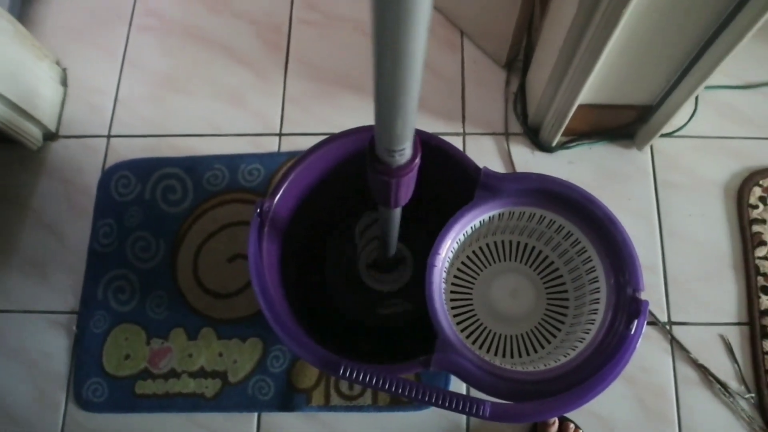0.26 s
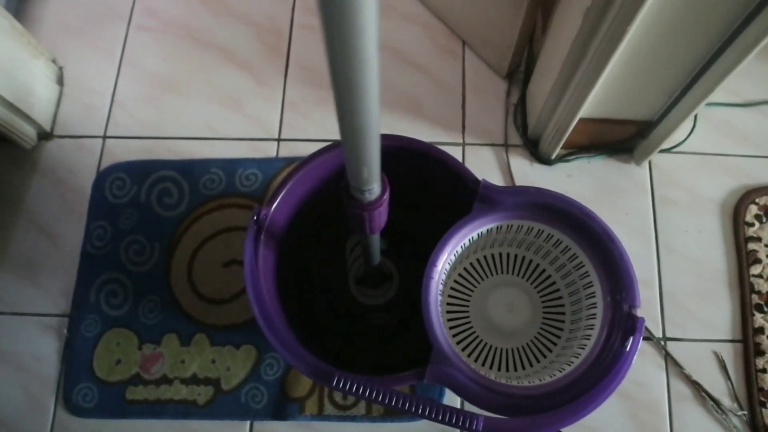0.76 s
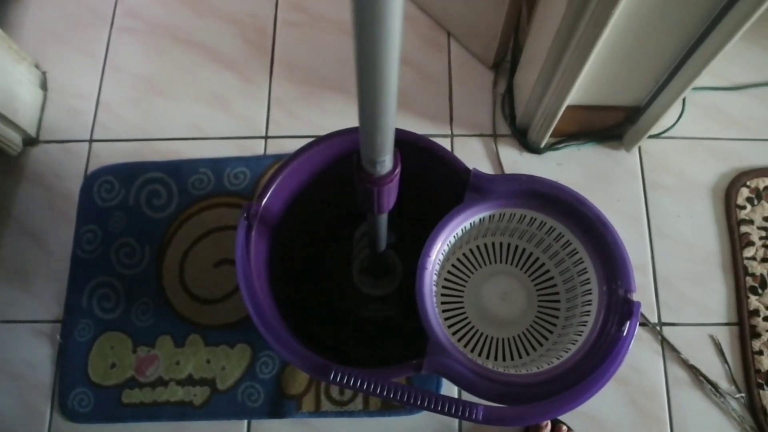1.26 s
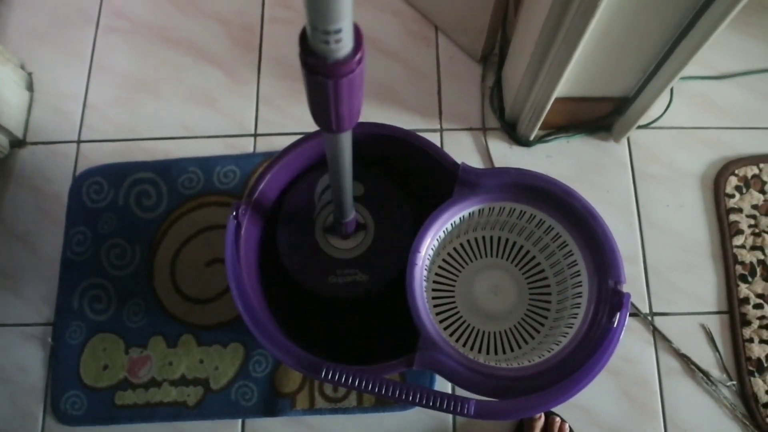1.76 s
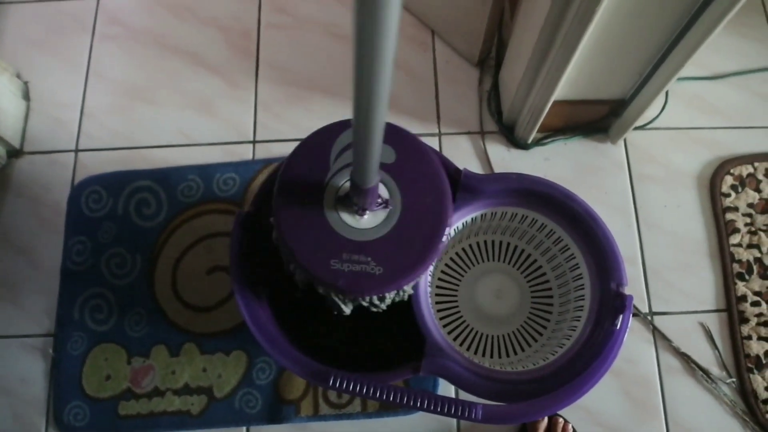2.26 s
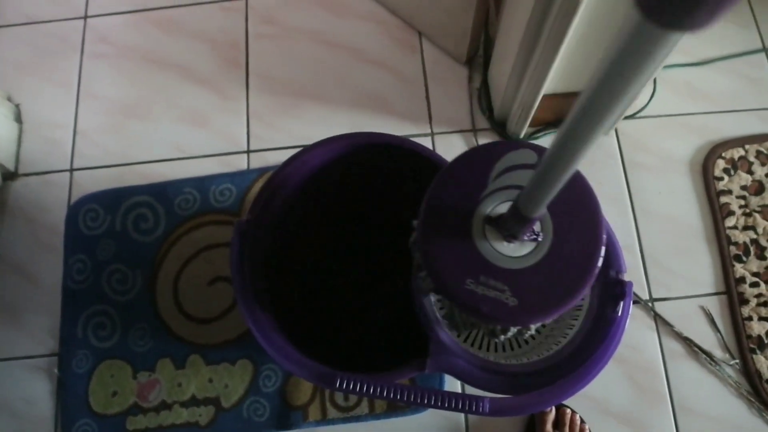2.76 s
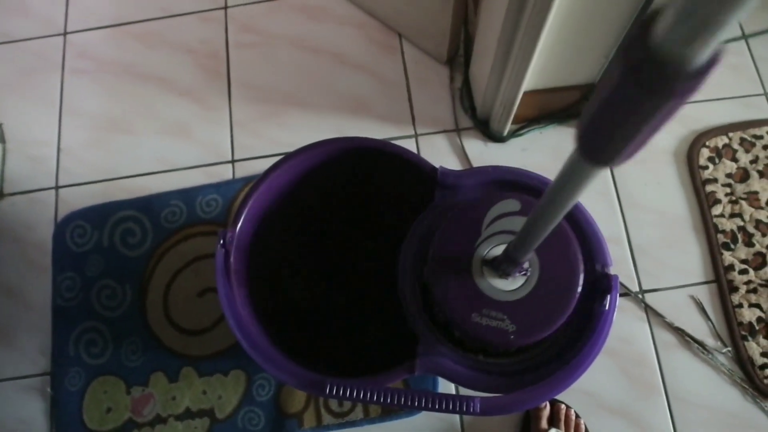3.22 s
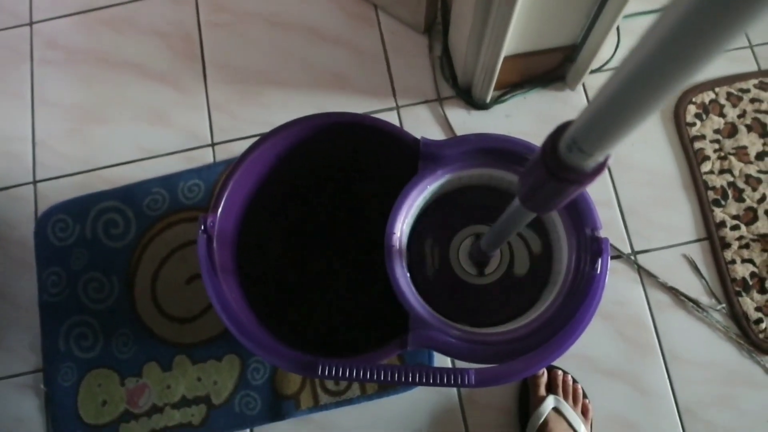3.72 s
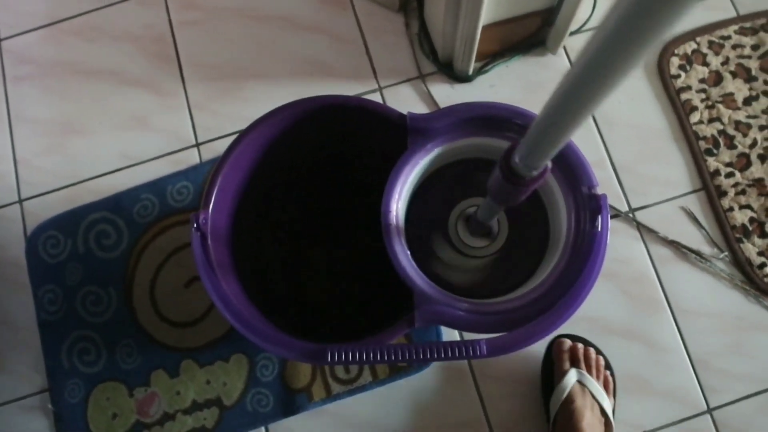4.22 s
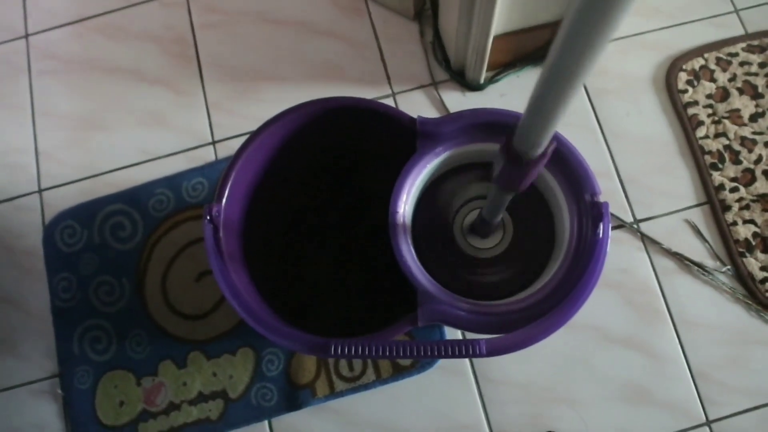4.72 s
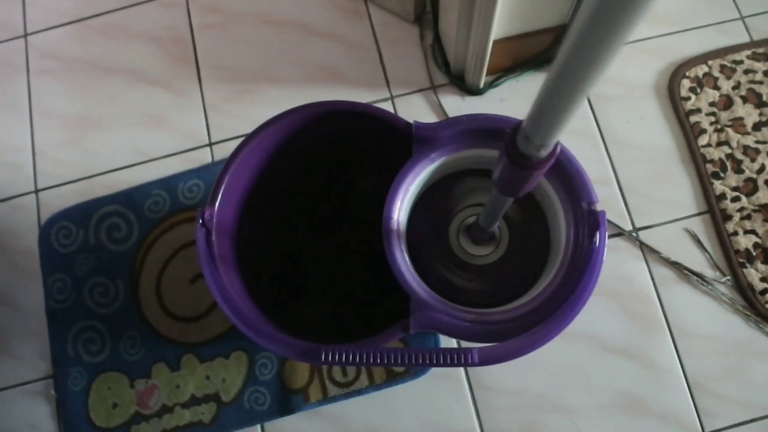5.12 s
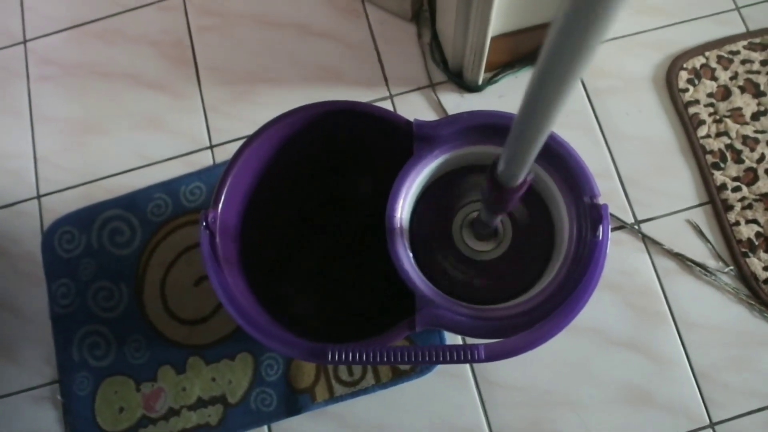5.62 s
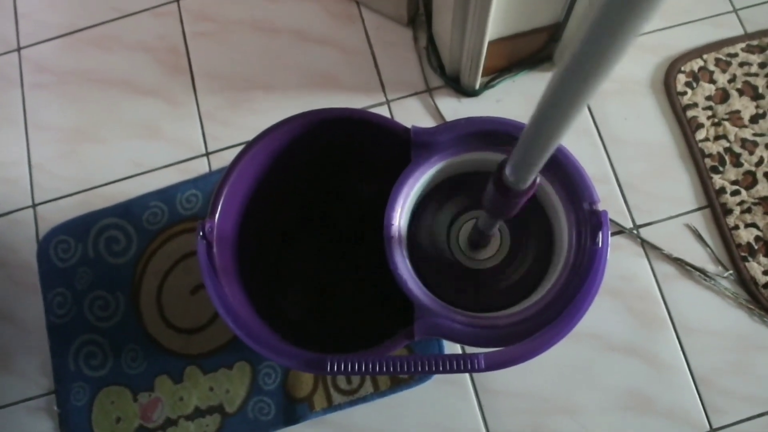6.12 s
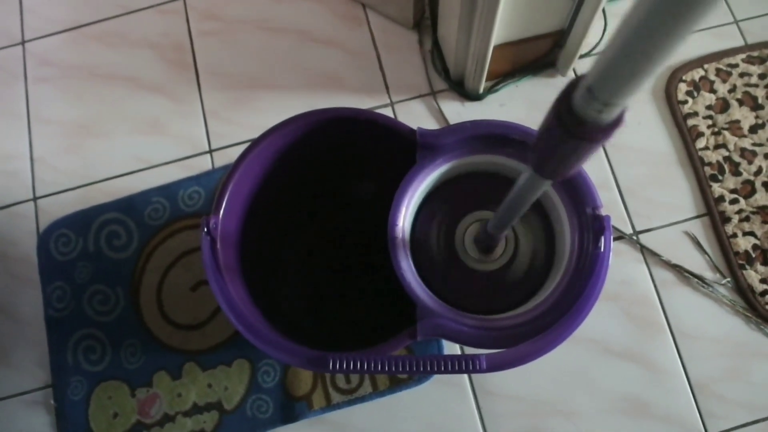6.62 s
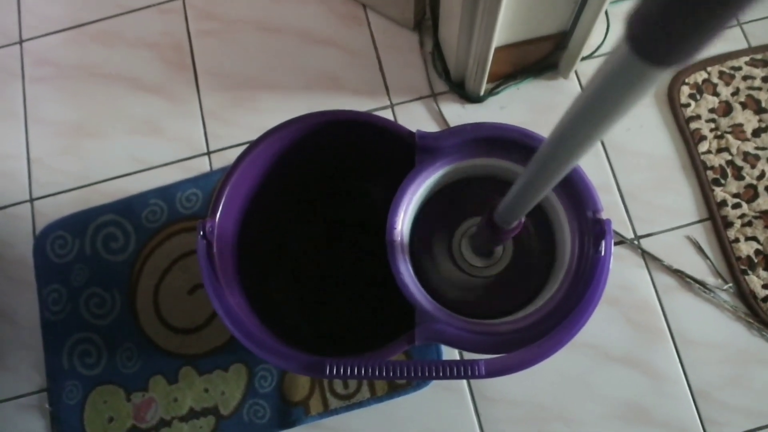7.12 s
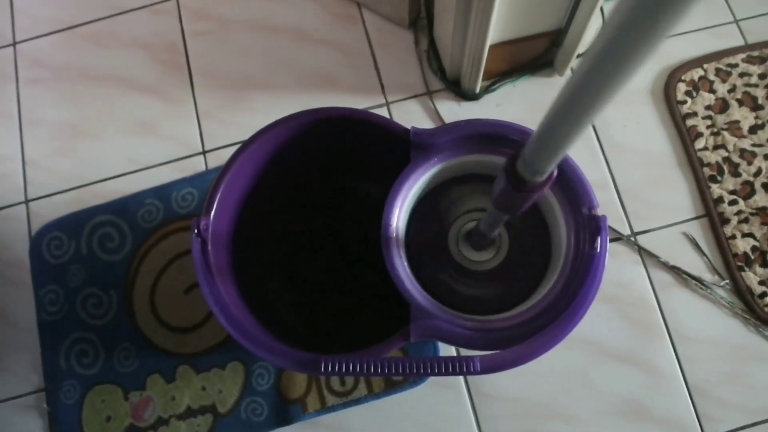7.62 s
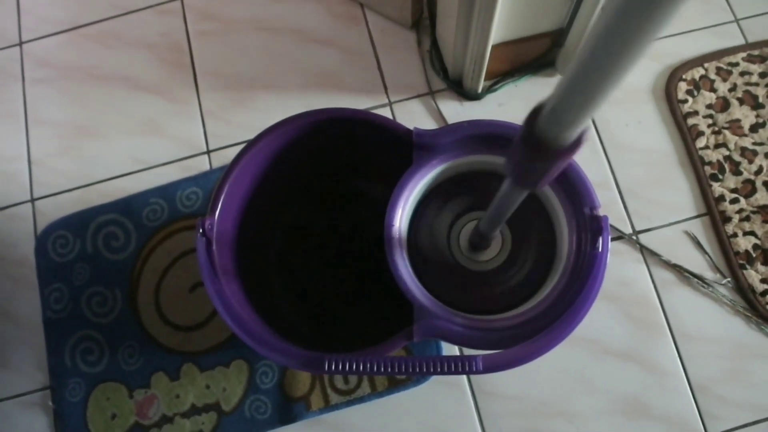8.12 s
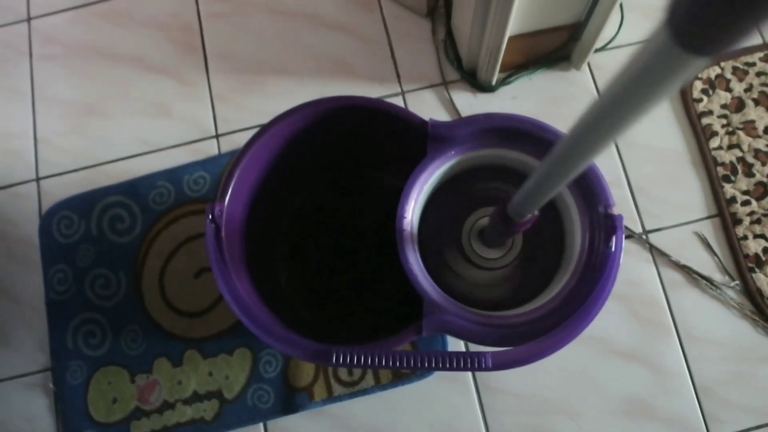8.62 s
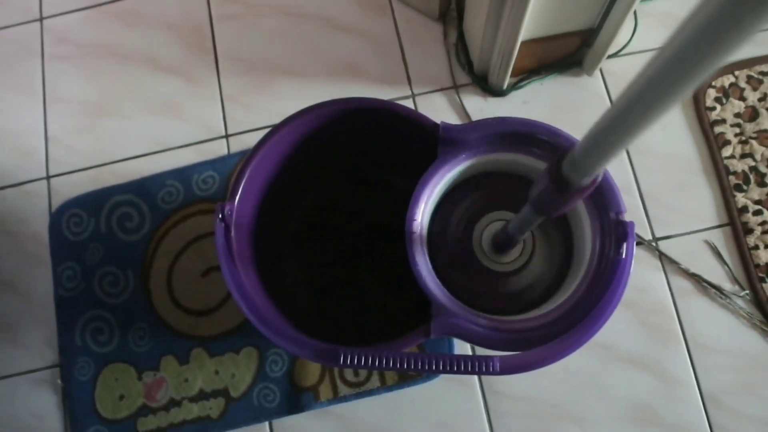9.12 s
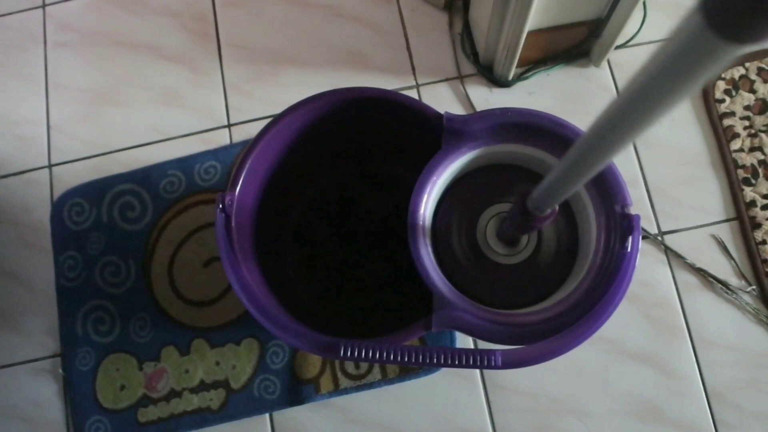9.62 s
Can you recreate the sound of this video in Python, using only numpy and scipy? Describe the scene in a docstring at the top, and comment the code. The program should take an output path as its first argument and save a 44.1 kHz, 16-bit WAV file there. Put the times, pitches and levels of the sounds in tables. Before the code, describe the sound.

Close to a plastic spin-mop bucket in a tiled room, with faint air noise, drone and hum. From 0 to 0.5 s, the end of a ratcheting stroke brings sharp handle clacks and hollow thumps around 280 Hz. Until 2.1 s, water sloshes and gurgles softly with sparse knocks and plinking drops. Around 2.2-2.8 s the lifted head sheds a brighter patter of drips, then it settles quietly into the basket, with small ticks and low rumbling until 4.4 s. From 4.5 s pumping starts: coarse, toothy grinding, dense plastic-metal clacks and bucket drumming. Strokes bottom near 4.8, 5.7, 6.6, 7.4, 8.1 and 8.9 s, with another running to the end; between them grinding slackens. Spray hisses finely, and the pole briefly sings near 1.4 kHz late in strokes. Thumps are strongest near 6.5, 7.9 and 9.75 s. Short, low room reverberation; wide stereo, slightly limited treble.

```python
"""A spin mop is pumped in a plastic bucket of water, lifted dripping into the basket and pumped there.
The helical rod grinds, clacks and sings in its handle and pole; the wobbling head thumps and drums on the bucket.
Filtered noise and swarms of short bubbles make spray and trickle; single drops splat and plink.
Place: a tiled room with air noise, drone and mains hum. Distance: close, the room's answer well below.
Microphone: a small camera's two ports above, spread by a widening matrix, with soft overload and a treble limit."""
import sys
import numpy as np
from scipy import signal
from scipy.fft import rfft, irfft, next_fast_len
from scipy.io import wavfile
from scipy.ndimage import uniform_filter1d, map_coordinates

SR = 44100
rng = np.random.default_rng(int(sys.argv[2]) if len(sys.argv) > 2 else 0)


def inscribe(sig):
    """Save sig as 16-bit PCM at rate SR to the path in sys.argv[1].

    A 1-D sig is mono; a 2-D sig holds one channel per row.
    Samples are clipped to [-1, 1] before scaling.
    """
    pcm = np.round(np.clip(np.atleast_2d(sig).T, -1, 1) * 32767)
    wavfile.write(sys.argv[1], SR, pcm.astype(np.int16))


N = 434826

# Head against bucket: (time [s], level [dB], pitch [Hz])
THUMPS = [(0.149, -14.5, 283), (0.236, -18.5, 273), (0.343, -14.5, 295), (0.418, -20.5, 350),
          (0.458, -24.5, 334), (0.784, -30.5, 370), (0.825, -27, 333), (1.205, -20, 248),
          (1.502, -24.5, 336), (1.687, -29.5, 334), (1.931, -28.5, 287), (2.02, -29.5, 295),
          (2.072, -22, 300), (3.404, -30, 356), (4.373, -25.5, 284), (4.434, -24.5, 282), (4.481, -25, 286),
          (4.597, -25, 351), (4.672, -16, 284), (4.792, -15, 280), (4.898, -20, 277), (5.023, -20.5, 252),
          (5.468, -19.5, 246), (5.527, -15, 305), (5.578, -13, 261), (5.639, -14, 255), (5.684, -13, 271),
          (5.799, -24, 270), (5.89, -19.5, 268), (5.943, -25, 264), (6.366, -20.5, 318),
          (6.488, -10.5, 272.4), (6.518, -25, 272), (6.596, -13.5, 274.5), (6.69, -17.5, 272),
          (6.768, -11, 272), (7.175, -20, 300), (7.218, -21.5, 318), (7.278, -25.5, 358),
          (7.416, -19.5, 275), (7.506, -18.5, 271), (7.589, -12, 264), (7.937, -10, 265), (8.137, -15, 273),
          (8.234, -17, 273), (8.307, -12.5, 276), (8.333, -20, 271), (8.67, -21, 382), (8.731, -18.5, 264),
          (8.832, -16.5, 270), (8.93, -15, 266), (9.004, -19.5, 285), (9.045, -19, 285),
          (9.062, -11.5, 261), (9.443, -26, 280), (9.571, -24, 310), (9.612, -26, 283), (9.656, -13, 244),
          (9.7, -15.5, 302), (9.754, -7, 257)]
# Rod and rim contacts: (time [s], level [dB], strongest pitch [Hz], crack relative to the level [dB])
CLACKS = [(0.018, -16.5, 2590, -5.5), (0.051, -26.5, 1450, 1), (0.072, -20, 1970, -8),
          (0.085, -17, 1410, -6), (0.101, -18, 3350, -7.5), (0.13, -8, 1480, -12.5),
          (0.336, -15, 1106, -17), (0.411, -24.5, 1220, -11), (0.43, -12.5, 990, -27),
          (0.794, -22.5, 3280, -3), (0.802, -31, 3400, -10), (0.842, -23.5, 1300, -36),
          (1.213, -21.5, 1470, -7.5), (1.392, -22, 2300, -28), (1.518, -21, 1366, -16),
          (2.174, -28.5, 2070, -9.5), (2.286, -28, 2740, -6), (2.693, -27.5, 1650, -10),
          (3.402, -30, 1068, -9.5), (3.49, -26, 886, -10.5), (3.57, -23.5, 1890, -26),
          (3.799, -39.5, 1710, 1.5), (4.531, -22.5, 1590, -14), (4.549, -19, 1650, -16),
          (4.606, -18, 3450, -10.5), (4.629, -18.5, 2570, -14), (4.644, -17, 2630, -13),
          (4.751, -28, 1670, -3), (4.766, -23, 3440, -8), (4.782, -14, 1155, -3),
          (4.823, -15.5, 1040, -6.5), (4.862, -20, 1930, -3.5), (4.88, -22, 1050, -8),
          (4.892, -17.5, 1043, -6), (4.939, -16.5, 1054, -22), (5.012, -25, 1900, -2.5),
          (5.028, -19, 1620, -17.5), (5.437, -22, 1560, -25), (5.462, -20, 1770, -24),
          (5.478, -24, 1530, -27), (5.493, -21, 1640, -20), (5.552, -16.5, 2350, -11),
          (5.576, -16, 2710, -12), (5.588, -15.5, 2560, -13), (5.61, -18, 2520, -13),
          (5.623, -20.5, 2560, -7), (5.64, -16, 2220, -21), (5.667, -16.5, 2550, -13),
          (5.691, -18.5, 2070, -9), (5.723, -10.5, 1093, -7), (5.75, -13.5, 1260, -6),
          (5.764, -14, 2720, -8), (5.778, -21.5, 1180, 0.5), (5.786, -23, 1190, -8),
          (5.808, -20.5, 1150, 0.5), (5.854, -24, 1920, -3.5), (5.866, -17, 1410, -9.5),
          (5.941, -21.5, 1650, -8), (6.376, -18, 2530, -12.5), (6.453, -19.5, 2580, -20),
          (6.527, -17.5, 2180, -15), (6.599, -14.5, 1160, -3), (6.645, -17, 3300, -3.5),
          (6.792, -16, 1830, -11), (6.936, -27, 1030, -15), (7.027, -25, 1304, -10),
          (7.125, -21.5, 1590, -29), (7.194, -22, 2600, -6), (7.227, -20, 2610, -5.5),
          (7.275, -15.5, 2630, -10), (7.353, -13.5, 1390, -12.5), (7.389, -10.5, 3430, -8),
          (7.426, -20.5, 1120, -7), (7.467, -24.5, 2700, 0.5), (7.592, -16, 1080, -9),
          (7.843, -23, 1490, -32), (7.879, -30, 1580, -31), (7.935, -20, 1080, -23),
          (7.956, -19.5, 2000, -13), (8.081, -19, 2050, -14), (8.145, -12.5, 1040, -2),
          (8.19, -17, 1120, -15), (8.207, -24, 1000, -4), (8.228, -21, 2610, 1.5),
          (8.244, -21.5, 1970, -11), (8.335, -11, 1613, -12.5), (8.462, -22.5, 1030, -27),
          (8.597, -19, 1324, -35), (8.678, -24, 2500, -6), (8.694, -18.5, 2640, -12),
          (8.822, -19.5, 1380, -3), (8.839, -14.5, 1150, -6), (8.892, -15.5, 1040, -1.5),
          (8.919, -17.5, 1140, -7), (8.937, -13, 3230, -16), (8.979, -23.5, 1230, -12),
          (9.045, -17.5, 1670, -7), (9.14, -23.5, 1620, -19), (9.265, -23.5, 1350, -34),
          (9.346, -22, 1520, -34), (9.421, -23, 1960, -14), (9.442, -16.5, 2570, -14),
          (9.471, -21.5, 2600, -4.5), (9.502, -22, 1990, -10), (9.533, -18, 2400, -38),
          (9.589, -16, 1960, -15), (9.741, -21.5, 1500, -26), (9.819, -21, 1940, -17),
          (9.845, -16.5, 1834, -20), (0.042, -15, 2550, -18), (4.802, -24, 1040, -2),
          (4.84, -15.5, 1030, -3), (6.387, -19, 2540, -13.5), (6.583, -27, 1080, -2),
          (6.613, -21, 1060, -5.5), (6.626, -19.5, 2720, -3.5), (6.664, -20, 3340, -21),
          (6.682, -19.5, 2660, -11), (7.307, -23.5, 1550, -8), (7.449, -18.5, 3330, -4),
          (8.094, -17.5, 1470, -11), (8.861, -28, 2600, -23), (8.904, -16.5, 1110, -25),
          (9.452, -21, 2110, -26), (9.62, -17, 2520, -27), (9.71, -24, 1980, -32)]
# Brightest contacts, short treble flashes: (time [s], relative level [dB])
SNAPS = [(0.7991, -28), (6.6467, -32), (7.3903, -21), (8.1459, -23), (8.2275, -24), (8.333, -28),
         (8.8393, -32), (8.8922, -26)]
# Single drops: (time [s], relative level [dB], bubble pitch [Hz])
DRIPS = [(0.4656, -23, 3440), (0.605, -27, 2380), (0.9413, -29, 2050), (0.9845, -27.5, 1950),
         (1.1752, -25.5, 2450), (1.4637, -21, 2320), (1.6888, -25.5, 2490), (1.7374, -24, 2100),
         (1.858, -28, 2350), (2.3403, -23.5, 1800), (2.419, -29, 2500), (2.505, -28, 873),
         (2.546, -23, 904), (2.601, -26, 1550), (2.628, -21.5, 2850), (2.682, -24.5, 515),
         (2.7236, -19.5, 3750), (2.839, -26, 3660), (2.869, -26, 1530), (2.992, -32.5, 1730),
         (3.1714, -28, 2000), (3.3374, -25.5, 2510), (3.4233, -25.5, 1260), (3.449, -30.5, 860),
         (3.835, -25.5, 1450), (3.913, -24, 2260), (3.9739, -24, 2530), (6.2438, -29, 1660),
         (6.274, -32, 1430), (6.313, -28.5, 1600)]
# Resonances of handle, metal pole and bucket: (frequency [Hz], width [Hz], relative level [dB])
HANDLE_MODES = [(907, 257, 4), (1055, 210, 6.5), (1354, 270, 6), (1940, 370, 6.5), (2587, 320, 3.5),
                (3313, 190, -0.5), (4030, 510, -10), (5250, 300, -5)]
POLE_MODES = [(730, 89, -5), (1435, 42, -2.5), (1979, 79, 2), (2606, 130, 2), (3396, 156, -2.5),
              (5040, 40, -13.5)]
BUCKET_MODES = [(121.7, 30, -8), (162, 32, -7), (215, 17.7, -1.5), (272.5, 56.3, 0.5), (354, 53.6, -1),
                (512, 254, -8.5)]
# Noise colours of rubbing, cracks, spray and room air: (frequency [Hz], relative density [dB per Hz])
SCRAPE_SPECTRUM = [(240, -11), (400, 2), (1360, -1.5), (1940, -2.5), (3060, -8), (3380, -9.5),
                   (4370, -17.5), (5180, -24), (12000, -35), (15600, -72), (22000, -120)]
CRACK_SPECTRUM = [(2500, 2.5), (4500, 2.5), (6000, -2), (9000, -12), (12000, -22.5), (15800, -53)]
SPRAY_SPECTRUM = [(290, -40), (500, -28), (866, -8.5), (1060, -7), (2420, -12), (5660, -18.5),
                  (12000, -27.5), (14700, -54), (15800, -64)]
AIR_SPECTRUM = [(13, -25), (22, -4), (59, 4), (166, -5), (224, 3), (293, 0.5), (662, -18), (1690, -18.5),
                (2110, -55), (3630, -16), (8000, -84), (10400, -60), (17600, -120)]
# Low tones of the room: (time [s], drone level [dB], mains hum level [dB])
DRONE_AND_HUM = [(0.0, -49, -59), (0.3, -68, -54.5), (1.73, -57, -46.5), (2.83, -49, -55.5),
                 (3.35, -58, -50), (5.74, -74, -54), (5.88, -62, -66), (7.17, -41, -48.5), (9.11, -57, -56),
                 (9.86, -41, -43)]
# Decay of the tiled room: (frequency [Hz], t60 [s])
ROOM_T60 = [(200, 0.36), (2000, 0.34), (10000, 0.099)]
# Sound common to both ports: (frequency [Hz], shared part of the power [0 to 1])
ALIKE = [(60, .995), (400, .995), (700, .97), (1500, .85), (2700, .55), (3300, .75), (5000, .85),
         (8000, .62), (12000, .3), (15000, .3)]
# Phase between the ports: (frequency [Hz], left leads by [radians])
LEAD = [(20, .08), (45, .15), (90, .38), (260, 1.1), (1460, 1.5), (2000, 1.7), (2900, 3.1), (3400, 3.35),
        (6000, 3.14), (16000, 3.14)]
# Balance of the ports: (frequency [Hz], left minus right [dB])
TILT = [(60, -1), (110, -1.5), (200, -1), (380, 0.5), (700, -1), (1290, -6), (2380, -14), (4400, -8),
        (8120, -3.5), (15000, -7.5)]
# Rod at work: (time [s], share [1 while driven, 0 while the head soaks and drains])
ROD_DRIVEN = [(0, 1), (.16, 1), (.25, 0), (4.45, 0), (4.53, 1), (9.86, 1)]
# One push of the handle a row: (push starts [s], bottoms out [s], grind and boom faded [s], can precede the bottom,
# grind at the start [dB], grind at the bottom [dB], boom [dB], boom once faded [dB], spray [dB])
STROKES = [(-0.3, 0.04, 0.19, -36, -37.5, -45, -45, -54),
           (4.58, 4.806, 5.09, -36.5, -31.5, -33.5, -44, -40),
           (5.54, 5.744, 5.65, -29, -28, -32.5, -59, -39), (6.397, 6.599, 6.76, -36, -31, -38.5, -39, -35),
           (7.186, 7.367, 7.72, -35, -31.5, -35.5, -39, -40),
           (7.93, 8.13, 8.33, -34.5, -28.5, -35.5, -39.5, -35),
           (8.68, 8.88, 9.28, -30.5, -37, -36, -37.5, -44), (9.421, 9.952, 10.1, -34, -33, -34, -37, -42)]
# Head soaks, drains and starts to turn: (time [s], trickle level [dB], boom level [dB], spray level [dB])
SOAK = [(0.2, -52, -44.5, -102), (0.47, -49, -42.5, -62), (0.7, -49, -59, -60), (0.82, -46, -40.5, -46),
        (0.99, -53, -51, -86), (1.23, -54.5, -89, -53), (1.37, -52, -46.5, -66), (1.64, -48, -45.5, -56.5),
        (1.89, -52, -60, -65), (2.11, -49, -49, -58.5), (2.25, -54.5, -56, -46.5), (2.5, -42, -46, -44),
        (2.72, -40, -41, -48), (2.79, -68, -50.5, -51), (2.94, -55, -46, -59.5), (3.75, -49.5, -51.5, -56),
        (3.84, -70, -56, -48.5), (3.98, -53, -42, -47.5), (4.25, -70, -41.5, -46), (4.5, -52, -34.5, -41)]

# load builds before the push, full rattle after the bottom, last fade of the grind to idle
GRIP_S, RATTLE_S, LET_GO_S = 0.24, 0.1, 0.084
# grind just before the push under its start, once faded under its bottom level; between strokes
GRIP_DB, FADED_DB, IDLE_DB = 11, 21.5, -53
# spray between strokes at the first spin in the basket, its fall, its rise before the bottom
MIST_DB, DRYING_DB_PER_S, FLING_S = -51, 4, 0.21
SLACK_DB, FREE_S = 5, 0.13  # the grind drops while the ratchet freewheels, this long after the bottom
# the head leaves the water; unevenness of the spray before and after
LIFT_S, SLOP_DB, STEADY_DB = 2.15, 3.5, 2
# floor thud of a -18 dB blow; dB per dB of blow; more while the head is heavy
THUD_DB, THUD_GROWS, WET_THUD_DB = -39, 0.65, 8
HEAVY_FROM_S, HEAVY_TO_S = 1.6, 3.5  # the soaked head is hauled out and set down
LEAD_IN_S = 0.001  # a contact starts to rub this long before it bites
SNAP_T60_S, SNAP_HZ, POLE_DB = 0.01, 8400, -45  # a snap's decay and lower edge; pole ring under all contacts
SING_DB, SING_S = -45, 0.048  # level and half-width in time of the pole's note
FULL_SCALE, TOP_HZ = 0.97, 15800  # overload ceiling; highest frequency kept


def amp(db):
    """dB to gain."""
    return 10 ** (np.asarray(db) / 20)


def unit(x):
    """x at rms 1."""
    return x / np.sqrt(np.mean(x ** 2) + 1e-20)


def along(points, hz):
    """(Hz, value) points interpolated on a log frequency axis."""
    f, v = np.transpose(points)
    return np.interp(np.log(hz + 1), np.log(f + 1), v)


def curves(rows):
    """One value per sample for each column after the time."""
    s, *cols = np.transpose(rows)
    return [np.interp(np.arange(N) / SR, s, c) for c in cols]


def wobble(rate):
    """A smooth random curve, rate knots a second."""
    coarse = np.arange(0, N + 32, 32)
    knots = rng.standard_normal(int(N * rate / SR) + 4)
    return np.interp(np.arange(N), coarse, map_coordinates(knots, [coarse * rate / SR]))


def filtered(x, response):
    """x times a complex response of frequency."""
    m = next_fast_len(N + SR // 2)
    return irfft(rfft(x, m) * response(np.fft.rfftfreq(m, 1 / SR)), m)[..., :N]


def coloured(x, spectrum):
    """x through a (Hz, dB) spectrum, at rms 1."""
    return unit(filtered(x, lambda hz: amp(along(spectrum, hz))))


def rung(x, modes):
    """x through a body's resonances, neighbours in opposite phase, at rms 1."""
    def response(f):
        return sum((-1) ** k * amp(db) * 1j * f * width / (centre ** 2 - f ** 2 + 1j * f * width)
                   for k, (centre, width, db) in enumerate(modes))
    return unit(filtered(x, response))


def ticks(rate, spread_db):
    """Random impulses, rate a second, of scattered strength."""
    there = rng.random(N) < rate / SR
    sign = np.sign(rng.standard_normal(N))
    return there * sign * amp(spread_db * np.clip(rng.standard_normal(N), -2, 2))


def bubbles(start, hz, gain, cycles, size):
    """One bubble per start time: a soft onset, then a pitch that rises as it dies."""
    t = np.arange(size) / SR
    age = hz[:, None] * t / cycles
    swell_and_die = 4.5 * age * np.exp(-2.5 * age)
    ring = gain[:, None] * np.sin(2 * np.pi * hz[:, None] * t * (1 + 0.07 * age)) * swell_and_die
    at = (start * SR).astype(int)[:, None] + np.arange(size)
    return np.bincount(at.ravel(), ring.ravel(), N)[:N]


def swarm(count, centre_hz, cycles, spread_db, size):
    """Many bubbles at random times, of scattered pitch and strength, at rms 1."""
    start = rng.random(count) * N / SR
    pitch, bulk = rng.standard_normal((2, count))
    hz = np.clip(centre_hz * np.exp(0.5 * pitch), 500, 12000)
    return unit(bubbles(start, hz, amp(spread_db * bulk), cycles, size))


def background():
    """Room air as coloured noise, plus a low drone that comes and goes and mains hum as wavering sines."""
    drone_db, hum_db = curves(DRONE_AND_HUM)
    turn = 2 * np.pi / SR
    drone = amp(drone_db + 1.3 * wobble(3.4)) * np.sin(turn * np.cumsum(41 + 2.5 * wobble(5.0)))
    hum = amp(hum_db + 1.8 * wobble(10)) * np.sin(turn * np.cumsum(59.5 + 1.12 * wobble(8.2)))
    air = amp(-51.0 + 2.0 * wobble(3.15)) * coloured(rng.standard_normal(N), AIR_SPECTRUM)
    return air + drone + hum


def pumping():
    """Levels of grind, boom and spray in dB: each stroke grips, pushes, rattles and fades."""
    grind_points, boom_points, spray_points = [], [], []
    first_spin = STROKES[1][1]
    for push, bottom, faded, bite_db, grind_db, boom_db, faded_boom_db, spray_db in STROKES:
        mist_db = MIST_DB - DRYING_DB_PER_S * (bottom - first_spin)
        grind_points += [(push - GRIP_S, IDLE_DB), (push - 0.01, bite_db - GRIP_DB), (push, bite_db),
                         (bottom, grind_db), (bottom + RATTLE_S, grind_db),
                         (faded, grind_db - FADED_DB), (faded + LET_GO_S, IDLE_DB)]
        boom_points += [(push - GRIP_S / 2, boom_db), (bottom, boom_db),
                        (bottom + 0.05, (boom_db + faded_boom_db) / 2),
                        (faded, faded_boom_db), (faded + 0.1, faded_boom_db)]
        spray_points += [(bottom - FLING_S, mist_db), (bottom + RATTLE_S, spray_db), (faded, mist_db)]
    return curves(grind_points) + curves(boom_points) + curves(spray_points)


def grind():
    """The rod chatters along the helix: about 70 ratchet teeth a second bunch the slips that ring the handle."""
    turn = np.cumsum(70 + 14 * wobble(25)) / SR
    teeth = amp(2.26 * wobble(60)) * (0.5 + np.exp(-4.5 * (turn % 1)))
    slips = rung(teeth * ticks(1200, spread_db=2.5), HANDLE_MODES)
    scrape = teeth * coloured(rng.standard_normal(N), SCRAPE_SPECTRUM)
    rubbing = rng.standard_normal(N) + 4 * ticks(600, spread_db=0.5)
    whirr = rung(teeth * rubbing, POLE_MODES)  # the pole rings along
    return unit(amp(1.6 * wobble(22)) * (slips + 0.5 * unit(scrape) + 0.84 * whirr))


def handle():
    """Grind, slacker while the ratchet freewheels just after each bottom."""
    t = np.arange(N) / SR
    free = sum((t > bottom) & (t < bottom + FREE_S) for _, bottom, *_ in STROKES)
    return amp(-SLACK_DB * free) * grind()


def boom(level_db):
    """Every small jolt of the turning head drums on the bucket's resonances."""
    jolts = ticks(130, spread_db=4.5) + 0.053 * rng.standard_normal(N)
    return amp(level_db + 2.17 * wobble(25)) * rung(jolts, BUCKET_MODES)


def water(level_db):
    """Fine spray hisses as noise and fizzes as tiny bubbles against the wall."""
    hiss = coloured(rng.standard_normal(N) + 3 * ticks(900, spread_db=3.5), SPRAY_SPECTRUM)
    fizz = swarm(count=2500, centre_hz=5140, cycles=2.7, spread_db=2.5, size=150)
    uneven_db = np.where(np.arange(N) < LIFT_S * SR, SLOP_DB, STEADY_DB)
    flicker_db = uneven_db * (wobble(16) + 0.67 * wobble(50))
    return amp(level_db + flicker_db) * (hiss + 0.12 * fizz)


def clacks():
    """Milliseconds of chatter ring the handle's nearest modes, rasp and crack; slosh and gurgle if undriven."""
    out, t = np.zeros(N + SR), np.arange(SR // 8) / SR
    hz, width, level = np.transpose(HANDLE_MODES)[:, :, None]
    bright = coloured(rng.standard_normal(N + SR), CRACK_SPECTRUM)
    dull = coloured(rng.standard_normal(N + SR), SCRAPE_SPECTRUM)
    swell = (t / 0.0025 * np.exp(1 - t / 0.0023)) ** 2
    fade = amp(-60 * t / 0.13) * (1 - np.exp(-t / 0.0076))
    splinter = swell + 0.41 * fade * amp(-60 * t / 0.28)
    slosh = amp(-60 * t / 0.15) * (1 - np.exp(-t / 0.0016))
    gurgle = swarm(count=2000, centre_hz=1150, cycles=10, spread_db=4, size=600)
    own_shape = (1 - np.exp(-(t / 0.0024) ** 2)) * amp(-60 * t / 0.026)
    sign = (-1) ** np.arange(len(HANDLE_MODES))[:, None]  # neighbouring modes move in opposition
    rings = sign * np.sin(2 * np.pi * hz * t) * np.exp(-np.pi * width * t)
    for s, db, top_hz, crack_db in CLACKS:
        first = round((s - LEAD_IN_S) * SR)
        at = slice(first, first + len(t))
        draw = rng.standard_normal((len(HANDLE_MODES), 1))
        chatter = rng.laplace(size=400) * swell[:400]
        # modes lose 11 dB per octave away from the contact's pitch
        gain = amp(level + 2.5 * draw - 11 * np.abs(np.log2(hz / top_hz)))
        ring = signal.fftconvolve(chatter, gain[:, 0] @ rings)[:len(t)]
        ring = ring / np.max(np.abs(ring))
        wet = 1 - np.interp(s, *np.transpose(ROD_DRIVEN))
        own = np.sin(2 * np.pi * top_hz * t) * own_shape  # the struck part's own ring
        crack = amp(crack_db) * np.resize(bright[at], len(t)) * splinter
        rasp = 0.068 * np.resize(dull[at], len(t)) * (fade + 2.0 * wet * slosh)
        gurgling = 0.11 * wet * np.resize(gurgle[at], len(t)) * slosh
        out[at] += amp(db) * (0.68 * ring + 1.15 * own + rasp + crack + gurgling)
    return out[:N]


def snaps():
    """The brightest contacts flash as treble noise; every contact rubs the pole and leaves it ringing."""
    t = np.arange(SR // 50) / SR

    def impulses(rows):
        return np.bincount([round(row[0] * SR) for row in rows], [amp(row[1]) for row in rows], N)

    flash = signal.fftconvolve(impulses(SNAPS), amp(-60 * t / SNAP_T60_S) * (1 - np.exp(-t / 0.0012)))[:N]
    treble = filtered(rng.standard_normal(N), lambda f: f > SNAP_HZ)
    rub = signal.fftconvolve(impulses(CLACKS), amp(-60 * t / 0.0084))[:N] * rng.standard_normal(N)
    return 2.4 * flash * treble + amp(POLE_DB) * rung(rub, POLE_MODES)


def thumps():
    """A soft blow swells over about a cycle, then the bucket's air rings out; part goes into the floor."""
    out, t = np.zeros(N + SR), np.arange(SR // 6) / SR
    hold = amp(-60 * np.maximum(t - 0.011, 0) / 0.014) + 0.15 * amp(-60 * t / 0.089)
    onset = 1 - np.exp(-t / 0.0028)
    for s, db, hz in THUMPS:
        overtone = amp(rng.normal(-9.5, 2.54)) * np.sin(2 * np.pi * 1.247 * hz * t)
        ring = np.sin(2 * np.pi * hz * t) + overtone
        heavy = HEAVY_FROM_S < s < HEAVY_TO_S
        thud_db = THUD_DB + WET_THUD_DB * heavy + THUD_GROWS * (db + 18.0) - db  # relative to the blow
        floor = sum(np.sin(2 * np.pi * low_hz * np.exp(rng.normal(0, 0.07)) * t) for low_hz in (118, 160))
        thud = amp(thud_db - 60 * t / 0.2) * floor
        out[round(s * SR):][:len(t)] += amp(db) * (ring * hold + thud) * onset
    return out[:N]


def trickle():
    """Water runs off the strands: drops patter on a wet rush, bubbles burble; smoother before the lift."""
    lifted = np.arange(N) > LIFT_S * SR
    rush = amp(0.4 * wobble(43)) * coloured(rng.standard_normal(N), SCRAPE_SPECTRUM)
    drops = swarm(count=2000, centre_hz=2500, cycles=9, spread_db=5, size=450)
    patter = drops * amp(4 * wobble(18))  # drops come in clumps
    burble = swarm(count=1500, centre_hz=950, cycles=11, spread_db=4, size=700)
    return unit(np.where(lifted, 0.3, 0.95) * rush + np.where(lifted, 1.1, 0.45) * patter + 0.64 * burble)


def drips():
    """Single drops: a noisy splat on the surface with the bubble's rising plink."""
    s, db, hz = np.transpose(DRIPS)
    hits = np.bincount((s * SR).astype(int), amp(db), N)
    puff = signal.fftconvolve(hits, amp(-60 * np.arange(SR // 10) / SR / 0.15))[:N]
    splat = 0.11 * puff * coloured(rng.standard_normal(N), SPRAY_SPECTRUM)
    return splat + 0.5 * bubbles(s, hz, amp(db), cycles=12, size=2500)


def singing():
    """Late in each push after the first, the rod rubs one mode of the pole into a narrow, wavering note."""
    t = np.arange(N) / SR
    swell = sum(np.exp(-((t - bottom + 0.028) / SING_S) ** 4) for _, bottom, *_ in STROKES[1:])
    return amp(SING_DB + 3.7 * wobble(30)) * swell * rung(rng.standard_normal(N), POLE_MODES[1:2])


def room(x):
    """The tiled room's answer: a noise tail, 300 samples late, each frequency dying at its own speed."""
    hz, t, z = signal.stft(rng.standard_normal(SR // 2), SR, nperseg=256)
    tail = signal.istft(z * amp(-60 * t / along(ROOM_T60, hz)[:, None]), SR, nperseg=256)[1]
    return signal.fftconvolve(np.pad(x, (300, 0)), tail / np.linalg.norm(tail))[:N]


def ports(x):
    """Both ports share the bass; toward the treble each adds its own share, its phase drifting in time and pitch."""
    z = signal.stft(x, nperseg=256, noverlap=192)[2]
    drift = uniform_filter1d(rng.standard_normal((2, *z.shape)), size=5, axis=1)
    drift = uniform_filter1d(drift, size=48, axis=2)
    own = 1.125 * signal.istft(z * np.exp(3j * unit(drift)), nperseg=256, noverlap=192)[1][:, :N]
    shared = filtered(x, lambda hz: np.sqrt(along(ALIKE, hz)))
    return shared + filtered(own, lambda hz: np.sqrt(1 - along(ALIKE, hz)))


def scene():
    """Mop, bucket and water in the room, as they reach the two ports."""
    trickle_db, *soaking = curves(SOAK)
    grind_db, *driven = pumping()
    rod, = curves(ROD_DRIVEN)
    boom_db, spray_db = (rod * a + (1 - rod) * b for a, b in zip(driven, soaking))
    churn = rod * amp(grind_db) * handle() + (1 - rod) * amp(trickle_db) * trickle()
    mop = churn + boom(boom_db) + water(spray_db) + drips() + thumps() + clacks() + snaps() + singing()
    return ports(mop + amp(-12.5) * room(mop) + background())


def record(dry):
    """The matrix turns and tilts the ports apart, their mean kept flat; then soft overload and the band limit."""
    def matrix(hz):
        side = np.array([[1], [-1]])  # left, right
        turn = amp(side * along(TILT, hz) / 2) * np.exp(0.5j * side * along(LEAD, hz))
        alike = along(ALIKE, hz)
        shared_power = alike * np.abs(turn.sum(axis=0)) ** 2
        own_power = (1 - alike) * np.sum(np.abs(turn) ** 2, axis=0)
        return turn / (np.sqrt(shared_power + own_power) / 2)

    x = filtered(dry, matrix)
    x = x / (1 + np.abs(x / FULL_SCALE) ** 6) ** (1 / 6)  # soft overload
    return filtered(x, lambda hz: hz < TOP_HZ)


dry = scene()
out = record(dry)
inscribe(out)
```